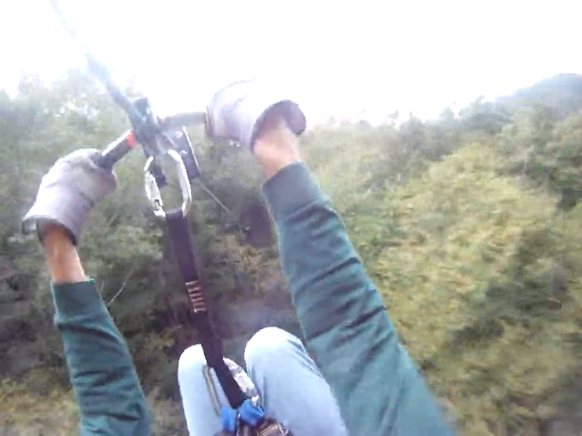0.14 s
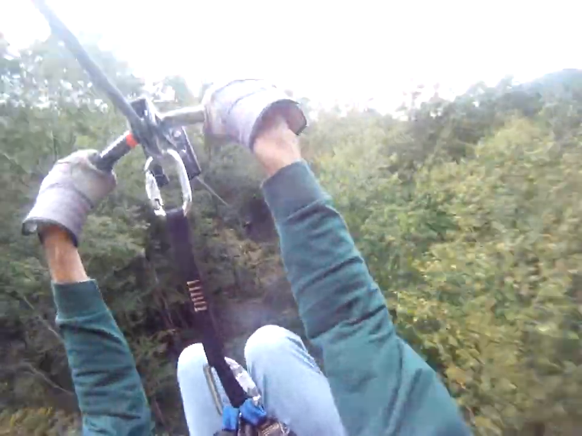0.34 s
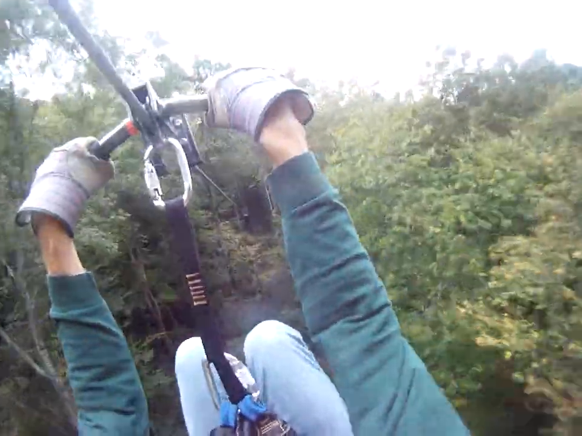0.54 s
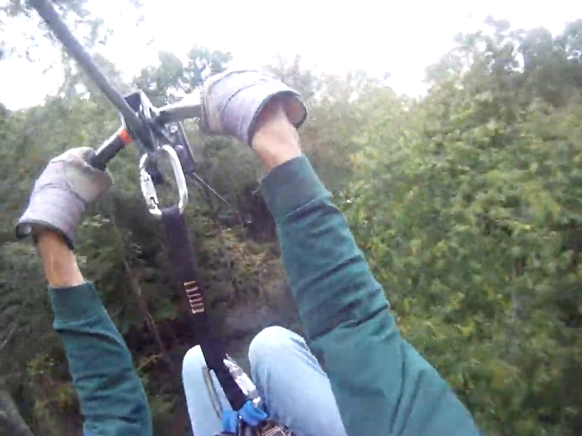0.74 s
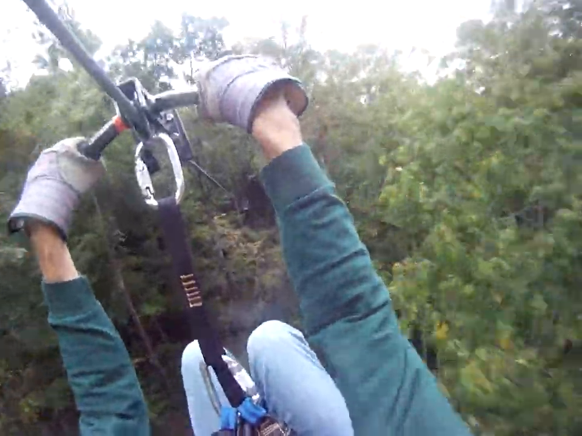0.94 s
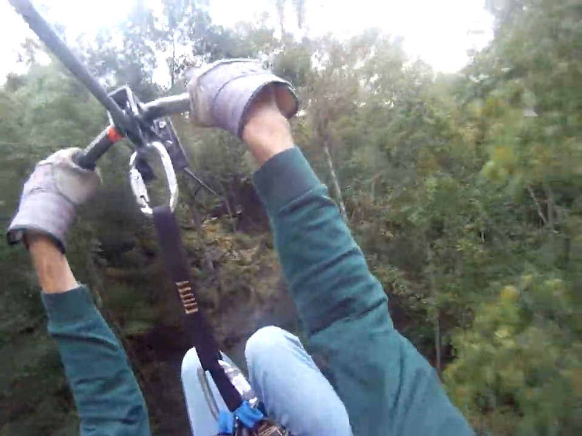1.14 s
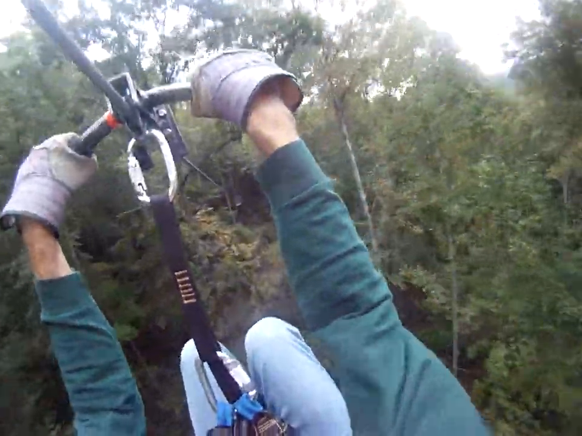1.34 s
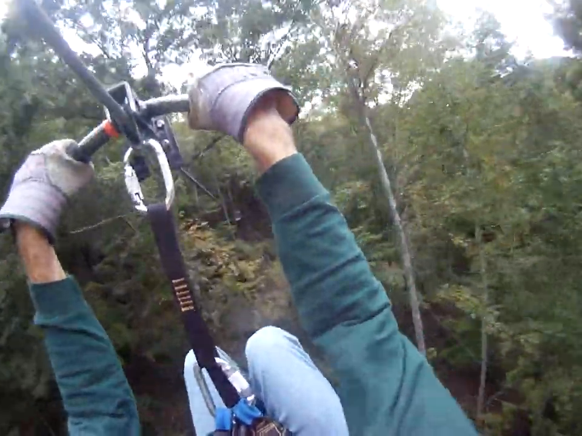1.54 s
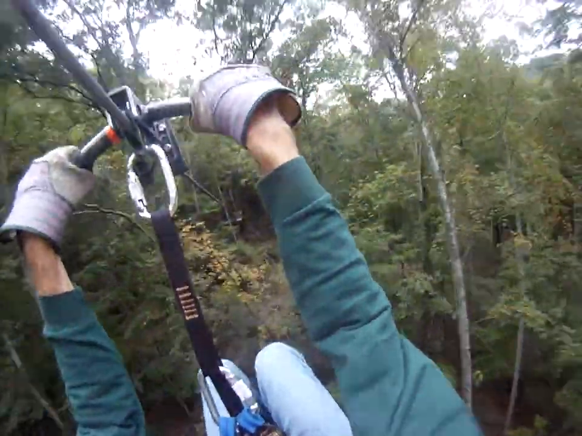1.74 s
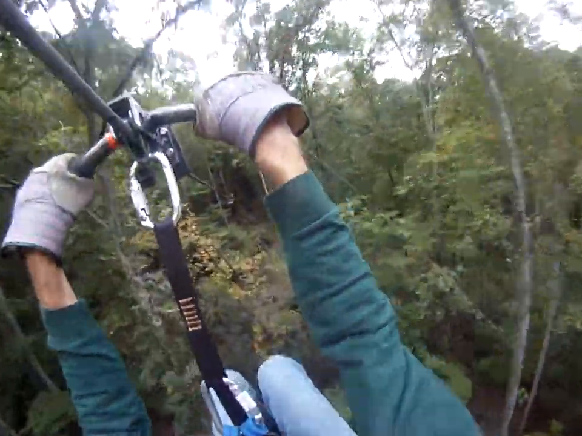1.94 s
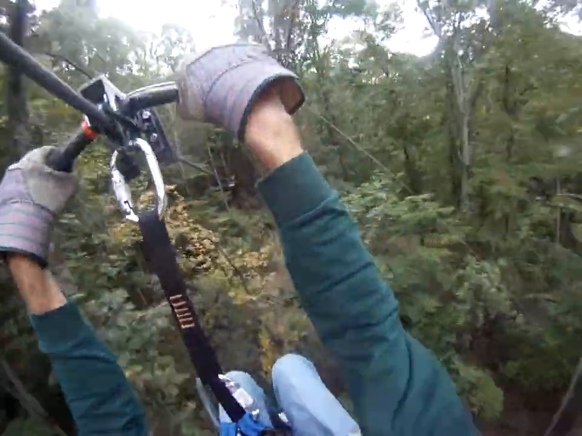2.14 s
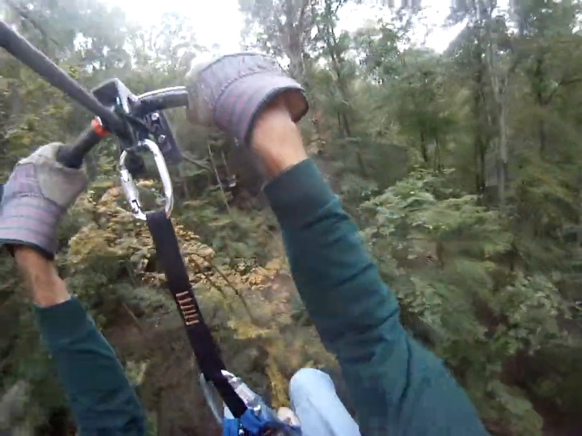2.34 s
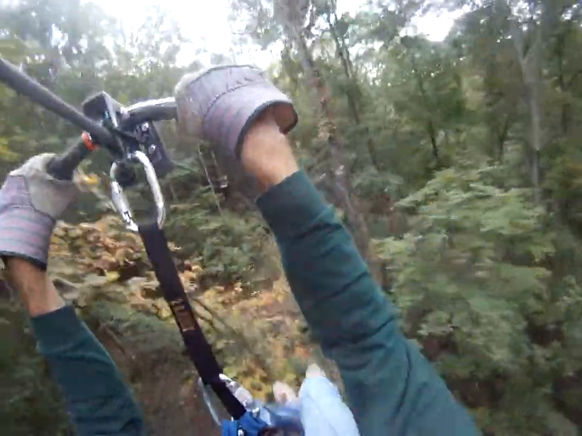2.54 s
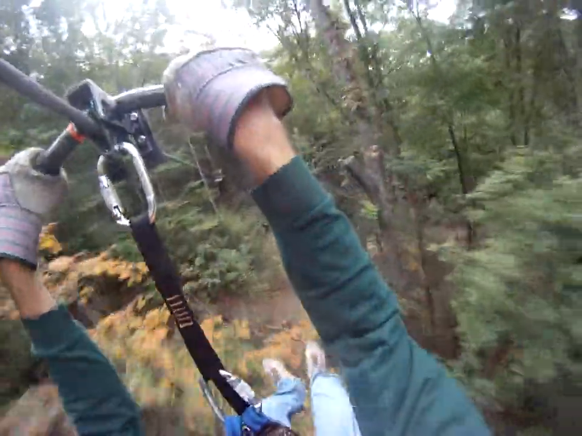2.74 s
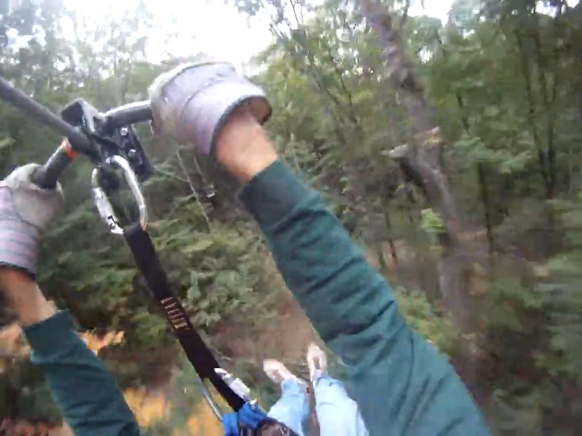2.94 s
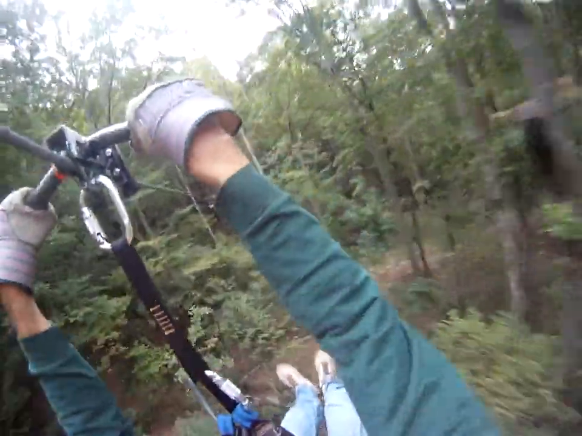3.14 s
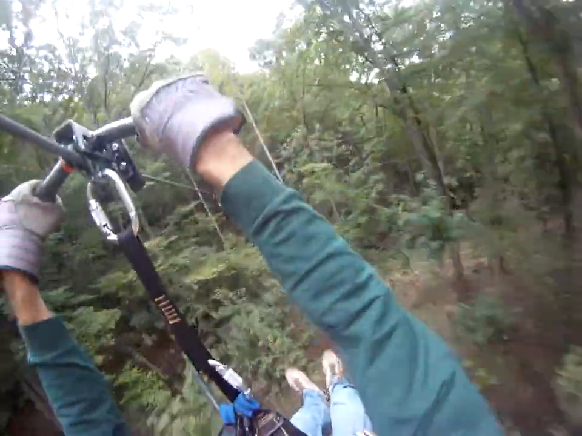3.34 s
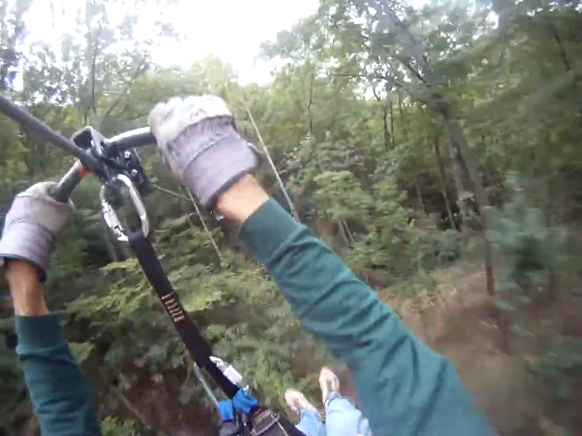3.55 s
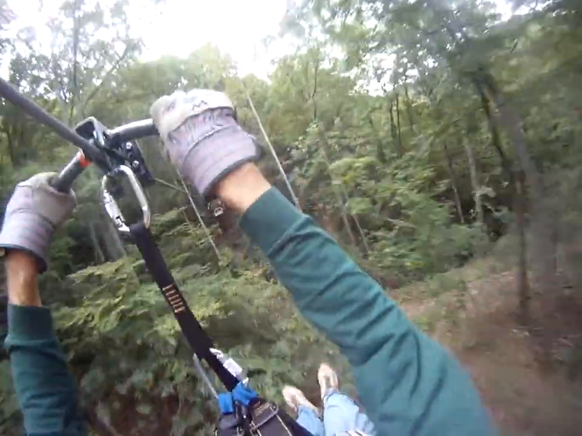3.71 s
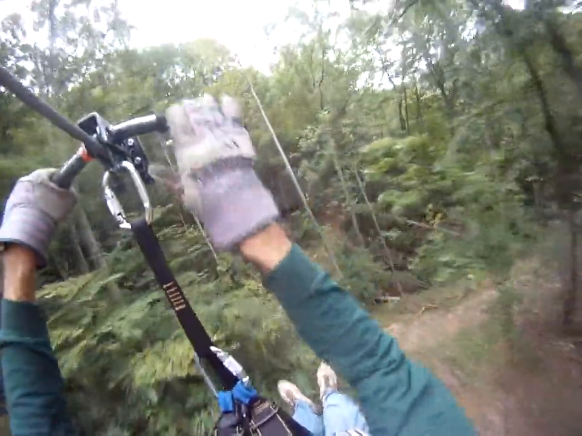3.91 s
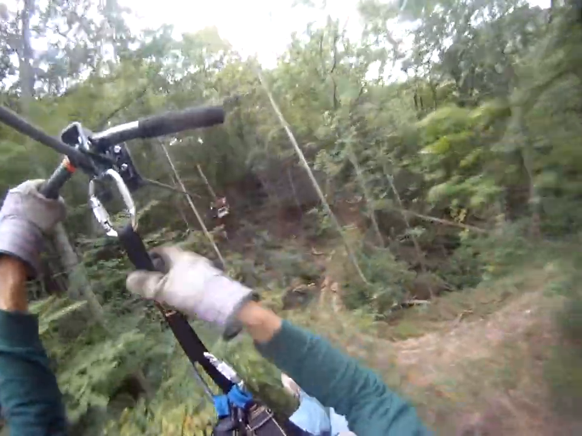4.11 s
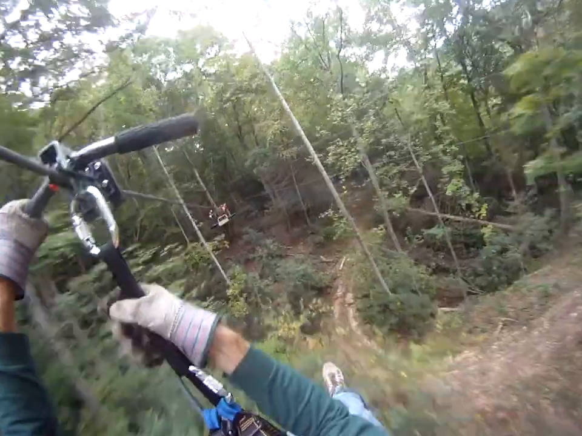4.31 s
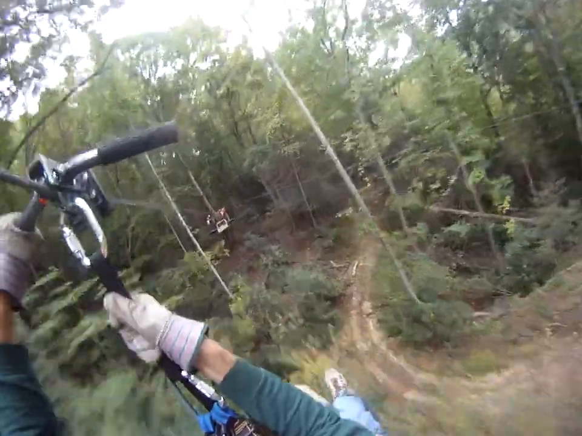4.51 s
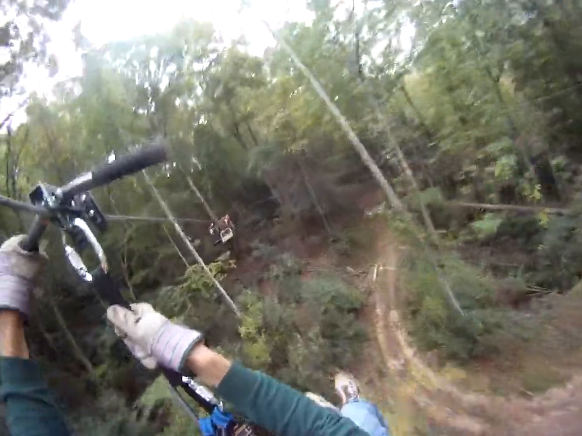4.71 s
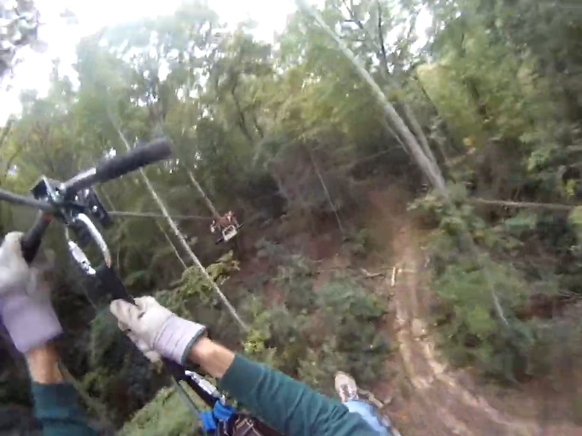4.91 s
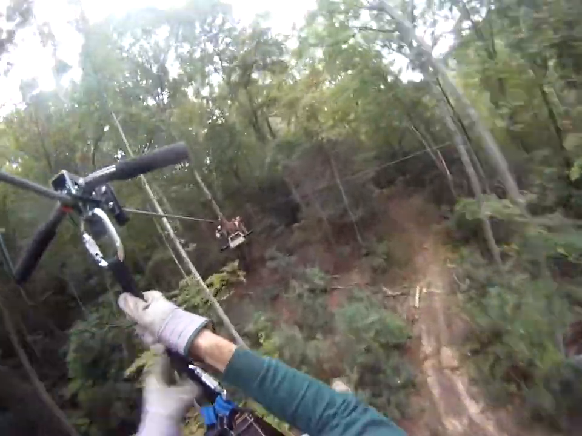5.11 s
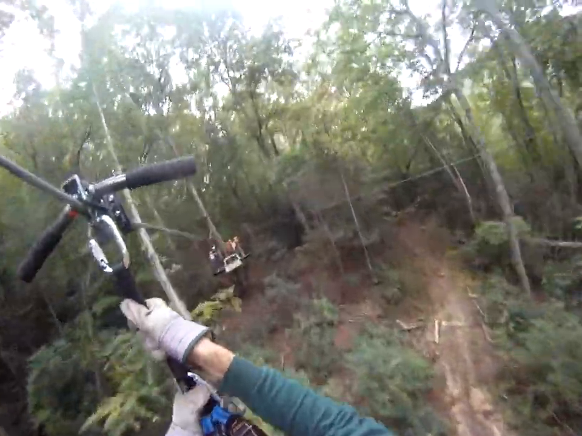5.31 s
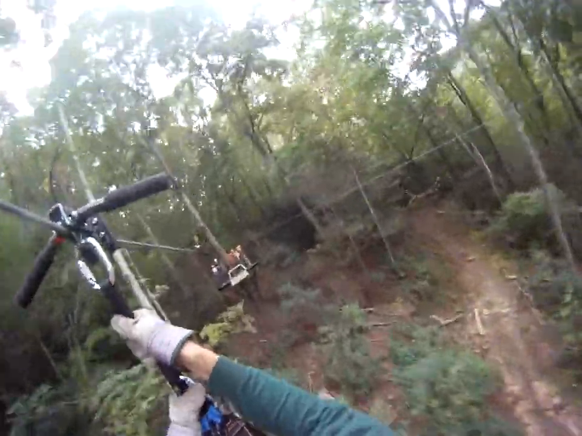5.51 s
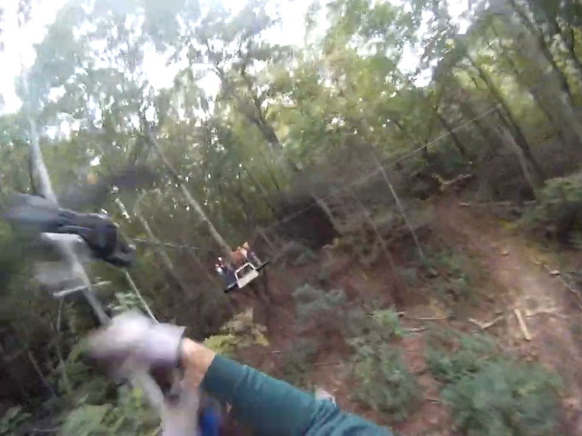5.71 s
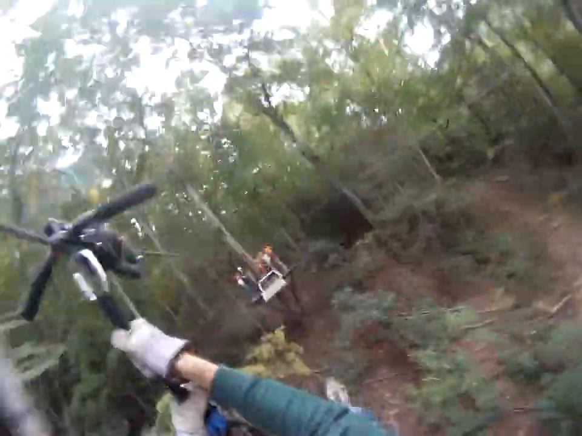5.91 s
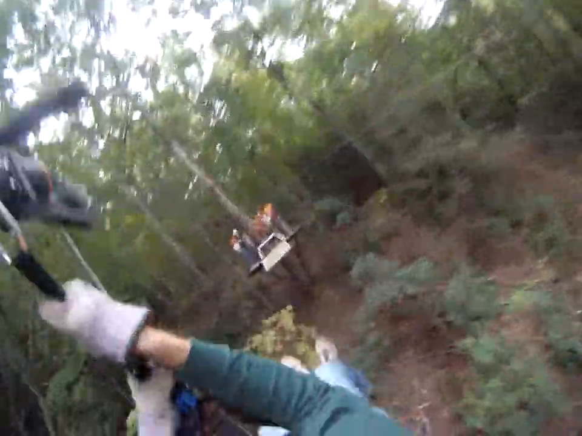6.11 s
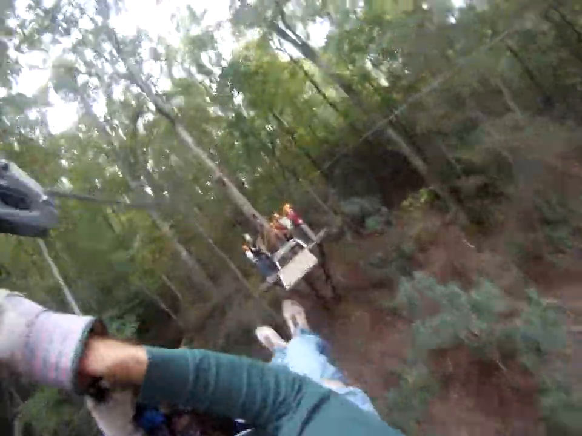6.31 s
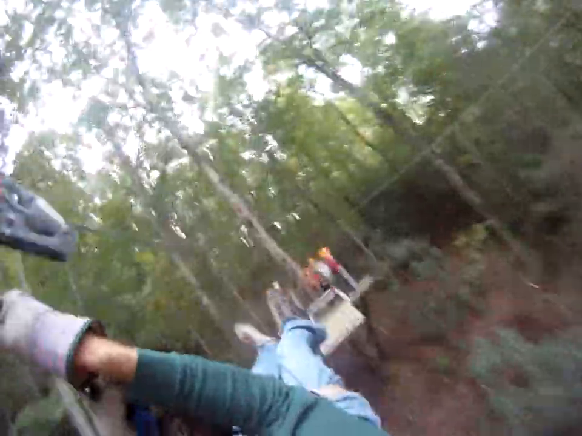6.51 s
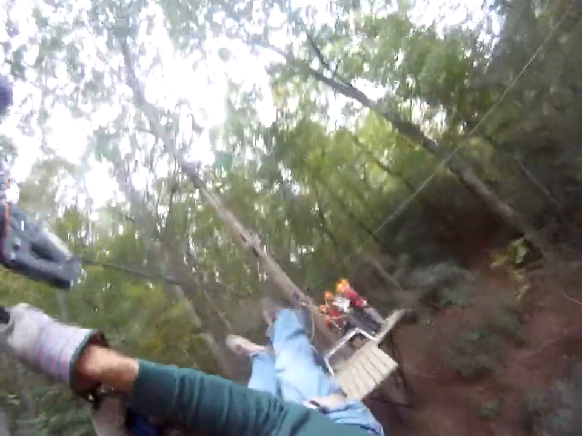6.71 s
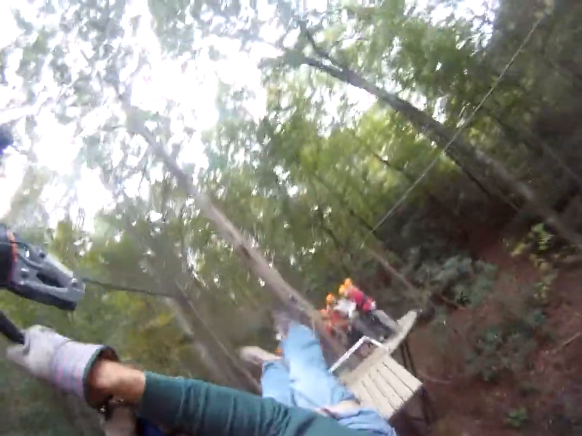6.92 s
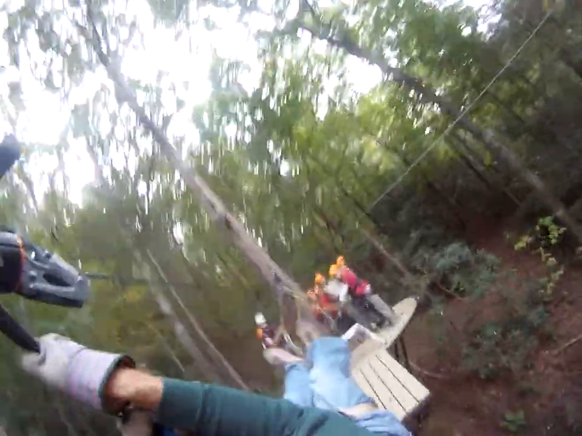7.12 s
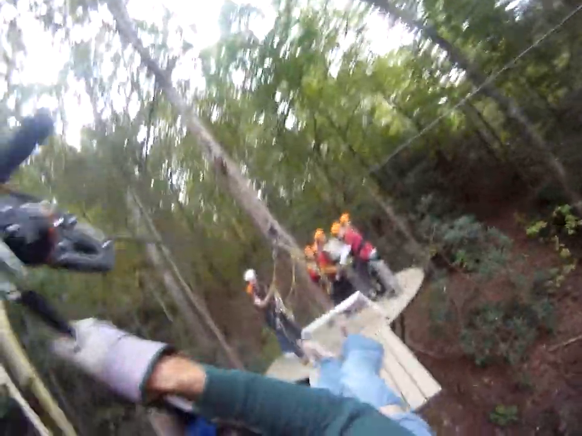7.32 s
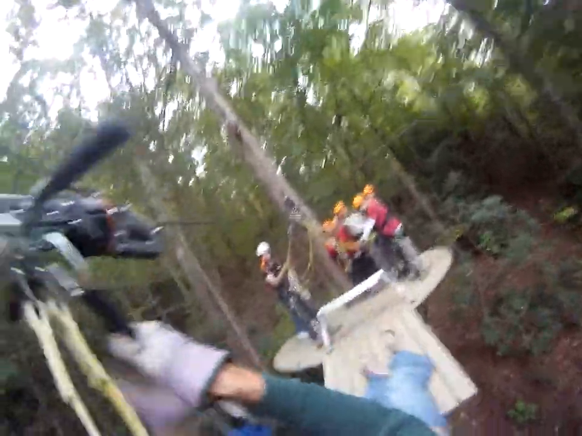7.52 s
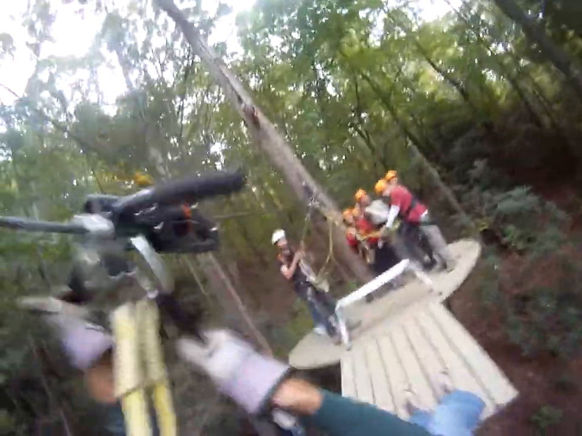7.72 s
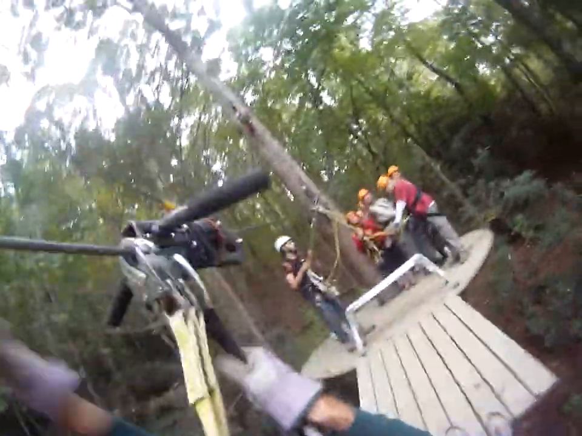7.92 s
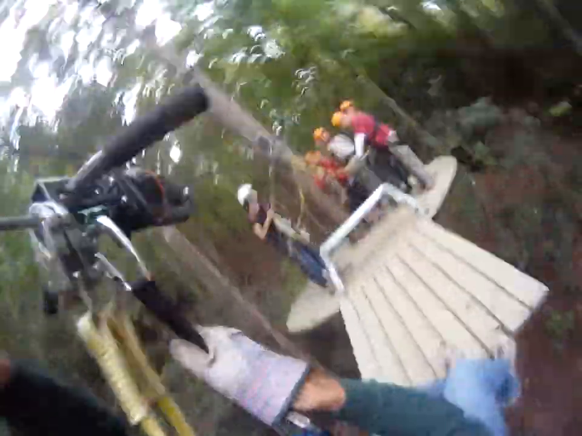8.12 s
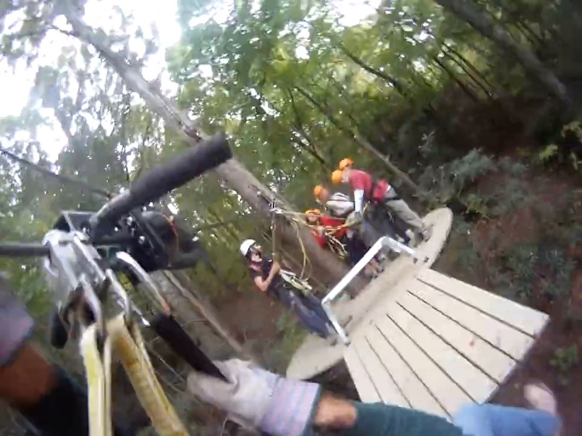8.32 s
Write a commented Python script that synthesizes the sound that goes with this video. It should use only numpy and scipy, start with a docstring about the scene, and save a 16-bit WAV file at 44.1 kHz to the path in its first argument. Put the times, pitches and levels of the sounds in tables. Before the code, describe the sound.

Metallic whirring of a zip line trolley with wind on the microphone, ending in a hard slam, knocks and a falling whine.

```python
"""A zip-line trolley runs down a stranded steel cable, an arm's length from a helmet camera, with wind on
the microphone. The strands rattle the sheaves and frame, a loose part sings in bursts and a flange squeals
now and then. Near 5.8 s the trolley slams into a brake block and rings differently with it. It then slows
to single ticks while the rider's gear knocks against the camera housing."""
import sys
import numpy as np
from scipy import signal
from scipy.fft import rfft, irfft, next_fast_len
from scipy.io import wavfile
from scipy.ndimage import uniform_filter1d

SR = 44100
rng = np.random.default_rng(int(sys.argv[2]) if len(sys.argv) > 2 else 0)


def to_wav(s):
    """Save 16-bit WAV."""
    ch = np.atleast_2d(s).T  # columns
    pcm = np.round(np.clip(ch, -1, 1) * 32767)  # PCM
    wavfile.write(sys.argv[1], SR, pcm.astype(np.int16))


N = 368235
TIME = np.arange(N) / SR
CATCH_S = 5.774  # the trolley meets the brake block
FASTEST_HZ, STRANDS_PER_TURN = 993, 10.7  # strands passing per second at top speed, and per wheel turn


def undb(db):
    """Decibels to gain."""
    return 10 ** (np.asarray(db) / 20)


def unit(x):
    """Scale to rms 1."""
    return x / np.std(x)


def drift(rate_hz):
    """Smooth random drift of spread 1."""
    hold = max(int(SR / rate_hz), 2)
    steps = np.repeat(rng.standard_normal(N // hold + 2), hold)
    return unit(uniform_filter1d(steps, hold)[rng.integers(hold):][:N])


def swell(s, length):
    """A smooth rise to 1 at time s and back, over the given length."""
    return np.cos(np.pi * np.clip((TIME - s) / length, -.5, .5))


def add(out, s, sound):
    """Mix a sound in at time s."""
    i = int(s * SR)
    out[i:i + len(sound)] += sound[:N - i]


def noise(spectrum, skirt_db=18):
    """Noise of rms 1 with a spectrum of (Hz, dB) points, falling skirt_db per octave beyond its ends."""
    size = next_fast_len(N, real=True)
    octave = np.log2(np.fft.rfftfreq(size, 1 / SR) + 1)
    hz, db = np.transpose(spectrum)
    outside = np.abs(octave - np.clip(octave, np.log2(hz[0]), np.log2(hz[-1])))
    gain = undb(np.interp(octave, np.log2(hz), db) - skirt_db * outside)
    return unit(irfft(rfft(rng.standard_normal(size)) * gain, size)[:N])


def ring(push, modes, size=8192):
    """A push rings a body with the given resonances."""
    freq = np.fft.rfftfreq(size, 1 / SR)
    power = sum(undb(db) ** 2 / (1 + (2 * (freq - hz) / width) ** 2) ** 2 for hz, width, db in modes)
    # minimum phase, so nothing rings ahead of the push
    cepstrum = irfft(np.log(power) / 2)
    cepstrum[1:size // 2] *= 2
    cepstrum[size // 2 + 1:] = 0
    response = irfft(np.exp(rfft(cepstrum)))[:size // 2]
    return signal.oaconvolve(push, response)[:len(push)]


def strike(modes, t60, scatter, size=8192):
    """One contact and the chatter that follows it, ringing the modes; peak 1."""
    push = scatter * rng.standard_normal(size) * np.exp(-np.log(1000) * TIME[:size] / max(t60, .003))
    push[0] += 1
    sound = ring(push, modes)
    return sound / np.abs(sound).max()


def waver(hz, width, steady):
    """A resonance kept ringing: a steady share of tone, the rest drifting over the given width; rms 1."""
    phase = 2 * np.pi * np.cumsum(hz + np.zeros(N)) / SR
    return unit((steady + drift(2 * width)) * np.sin(phase) + drift(2 * width) * np.cos(phase))


def speed(fastest_s=2.85, sag_hz_per_s2=9.3, brake_s=2.446, brake_shape=1.4, crawl_hz=41.16):
    """Strands passing per second: fastest at the bottom of the sag, then braked, hardest at first."""
    coasting = FASTEST_HZ - sag_hz_per_s2 * (np.minimum(TIME, CATCH_S) - fastest_s) ** 2
    braking_left = np.clip(1 - (TIME - CATCH_S) / brake_s, 0, 1)
    return crawl_hz + (coasting - crawl_hz) * braking_left ** brake_shape


# The boxy tone of the camera housing. Each row: frequency in Hz, width in Hz, level in dB.
HOUSING_MODES = [(670, 20, -7.5), (1000, 140, 0.5), (1106, 300, 1.5), (1840, 400, -8), (3470, 650, -16.5),
                 (10700, 1600, -20)]
def woods(db=-58):
    """Faint rustle of air and leaves, heard through the housing."""
    return undb(db) * unit(ring(rng.standard_normal(N), HOUSING_MODES))


# The two colours of the wind. Each row: frequency in Hz, level in dB.
RUMBLE_SPECTRUM = [(7.1, -24), (12, 0.5), (60, -12), (78, -28), (130, -120)]
BUFFET_SPECTRUM = [(34, -32), (58, 3), (124, -4.5), (173, -1), (189, -3), (232, -15.5), (269, -19),
                   (503, -27.5), (555, -30), (600, -25.5), (780, -44), (1320, -120)]
# Gusts and swings of the head. Each row: centre and length in seconds, rumble and buffet change in dB.
GUSTS = [(.27, .3, 0.5, 2.5), (1.55, 0.14, 2, 4.5), (1.75, .25, 2, 1), (3.697, 0.24, -4, 3),
         (5.89, .5, 11.5, 2), (6.782, .12, 6, -0.5), (7.73, 0.27, 9, 4.5), (8.12, 0.56, 5, 7)]
def wind(gust_db=2.4, eddy_db=1.5, breeze=0.31, turn_s=4.06, turn_length_s=1.23, shelter_db=-7):
    """Eddies at the microphone, growing as a power of airspeed: deep rumble and hollow buffeting."""
    air_db = 20 * np.log10(np.maximum(speed() / FASTEST_HZ, breeze))  # a breeze remains at a crawl
    turned = np.clip((TIME - turn_s) / turn_length_s, 0, 1)  # the rider turns, sheltering the microphone
    rumble_db = -33.8 + 0.8 * air_db
    buffet_db = -30.5 + 1.23 * air_db + shelter_db * turned
    for s, length, rumble_change, buffet_change in GUSTS:
        rumble_db += rumble_change * swell(s, length)
        buffet_db += buffet_change * swell(s, length)
    rumble = unit(noise(RUMBLE_SPECTRUM) * undb(gust_db * drift(20))) * undb(rumble_db)
    buffet = unit(noise(BUFFET_SPECTRUM) * undb(eddy_db * drift(25))) * undb(buffet_db)
    return rumble + buffet


# The low end of a knock. Each row: frequency in Hz, width in Hz, level in dB.
THUMP_MODES = [(40, 126, 1), (171, 34, -3.5), (350, 1200, -20.5)]
# Bumps on the camera. Each row: start in seconds, ring and thump peaks in dB, chatter t60 in seconds.
KNOCKS = [(4.94, -17.5, -27, 0.041), (5.826, -22, -22, 0.035), (5.84, -16, -22, 0.049),
          (5.856, -13.5, -9.5, 0.06), (5.881, -18, -40, 0.11), (5.904, -8, -6, 0.048),
          (6.054, -21.5, -33, 0.046), (6.372, -8, -18, 0.061), (6.379, -8.5, -17.5, 0.05),
          (6.391, -16, -25, .04), (6.583, -22, -31, 0.046), (6.982, -18, -31, 0.048),
          (7.412, -29, -39, 0.054), (7.836, -31.5, -47, .04), (7.902, -24, -33, 0.043),
          (7.926, -31, -44, 0.041), (8.126, -22, -35, 0.038), (8.135, -22, -36, 0.048),
          (8.167, -30, -42, 0.11)]
def knocks():
    """The rider's gear hits the housing: a dull ring over a thump."""
    out = np.zeros(N)
    for s, ring_db, thump_db, t60 in KNOCKS:
        add(out, s, undb(ring_db) * strike(HOUSING_MODES, t60, scatter=0.072))
        add(out, s, undb(thump_db) * strike(THUMP_MODES, t60, scatter=0.026))
    return out


# The loose part's voice. Each row: opening pitch and width in Hz, level in dB, share in the singing (0-1).
LOOSE_MODES = [(1884, 45, 0.5, 1), (4430, 150, -10.5, 0.1), (7570, 100, -17, 0), (10160, 110, -13, 0.07),
               (13870, 100, -15.5, 0.07)]
# Its bursts of song. Each row: start and length in seconds, pitch in Hz, level in dB.
SINGING_BURSTS = [(0, 0.74, 1880, -33.5), (0.695, 0.16, 1895, -26), (.84, .44, 1910, -28),
                  (1.241, 0.23, 1913, -25), (1.44, 0.33, 1915, -25), (1.742, .38, 1860, -34.5),
                  (3.901, .44, 1936, -31), (4.621, .26, 1870, -28.5), (4.828, 0.25, 1797, -30.5),
                  (5.04, 0.349, 1855, -26), (5.332, 0.52, 1815, -23.5)]
def loose_part(steady=1.56, surge_db=1.1, fade_s=0.06):
    """A loose metal part shaken into ringing in bursts; its lowest mode sings, the others shiver."""
    starts, lengths, pitches, _ = np.transpose(SINGING_BURSTS)
    bend_hz = np.interp(TIME, starts + lengths / 2, pitches) - pitches[0]
    bursts = sum(undb(db) * np.clip(np.minimum(TIME - s, s + length - TIME) / fade_s, 0, 1)
                 for s, length, _, db in SINGING_BURSTS)
    tones = sum(undb(db) * waver(hz + share * bend_hz, width, share * steady)
                for hz, width, db, share in LOOSE_MODES)
    return unit(tones * undb(surge_db * drift(14))) * bursts


# Brief squeals of the sheaves. Each row: centre and length in seconds, pitch in Hz, level in dB.
SQUEALS = [(1.3, 1.1, 4460, -32), (1.75, .12, 4800, -29), (2.353, 0.19, 3575, -21.5),
           (2.364, 0.32, 2510, -28.5), (2.36, 0.27, 8470, -28), (2.87, .32, 5430, -24.5),
           (2.873, .32, 6605, -29), (3.55, .2, 4790, -31), (3.84, 0.28, 3430, -20), (4.02, 0.12, 4810, -29),
           (4.48, 0.98, 1576, -34), (4.598, .4, 3850, -34), (6.081, 0.05, 2160, -12),
           (6.26, 0.067, 3555, -17), (6.461, 0.034, 3530, -17), (6.61, 0.039, 3545, -17),
           (7.16, .05, 3480, -25), (7.687, .04, 2160, -25), (7.687, .035, 9870, -37),
           (7.982, 0.032, 2156, -35)]
def squeals(width_hz=30, steady=1.24):
    """Now and then the cable rubs a flange and one resonance swells, part tone and part shiver."""
    out = np.zeros(N)
    shiver = steady + drift(2 * width_hz) + 1j * drift(2 * width_hz)
    for s, length, hz, db in SQUEALS:
        near = np.abs(TIME - s) < length / 2
        tone = unit(np.real(shiver[near] * np.exp(2j * np.pi * hz * TIME[near])))
        out[near] += undb(db) * swell(s, length)[near] * tone
    return out


# The pitched zip of the cable. Each row: multiple of the strand rate, relative level in dB.
WHINE_PARTIALS = [(1, -24.5), (1.5, -42), (1.65, -32), (2, -24), (2.5, -29.5), (3, -29.5), (4, -30.5),
                  (5, -36)]
def whine(strand_hz, jitter=0.00296, waver_db=2, top_db=2, fall_db_per_hz=0.1, braked_db=2.8, fade_hz=385):
    """The strands' regular ripple: clear at top speed, growing again under braking, gone at a crawl."""
    slowing = strand_hz.max() / np.maximum(strand_hz, fade_hz)
    phase = 2 * np.pi * np.cumsum(strand_hz * (1 + jitter * slowing * drift(40))) / SR
    coasting_db = fall_db_per_hz * (strand_hz - FASTEST_HZ)
    load_db = top_db + np.where(TIME < CATCH_S, coasting_db, braked_db * (slowing - 1))
    load = undb(load_db) / (1 + (fade_hz / strand_hz) ** 8)
    return load * sum(undb(db + waver_db * drift(7)) * np.sqrt(2) * np.sin(multiple * phase)
                      for multiple, db in WHINE_PARTIALS)


def rattle(strand_hz, hits_per_strand=30, grain_db=1.0, bunching=0.43, wear=0.59, mark_count=512):
    """Dense tiny impacts, bunched as each strand passes, and wheel marks that return on every turn."""
    strands = np.cumsum(strand_hz) / SR
    struck = rng.random(N) < hits_per_strand * strand_hz / SR
    impacts = unit(struck * rng.standard_normal(N) / np.sqrt(strand_hz) * undb(grain_db * drift(900)))
    turns = strands / STRANDS_PER_TURN * rng.uniform(.9, 1.1)  # no two parts turn at quite the same rate
    marks = np.floor(turns * mark_count).astype(int)
    depth = rng.standard_normal(mark_count)[marks % mark_count]
    tread = unit(depth * np.diff(marks, prepend=0) / np.sqrt(strand_hz))
    return unit((impacts + wear * tread) * (1 + bunching * np.cos(2 * np.pi * strands)))


def body(modes, ripple, rattles, sheave_db, frame_db, split_hz=3045):
    """The ripple rings every mode, each rattle its own group: frame below the split, sheaves above."""
    sound = ring(ripple, modes)
    sound += sum(ring(push, modes[i::len(rattles)]) for i, push in enumerate(rattles))
    frame = signal.sosfiltfilt(signal.butter(6, split_hz, "low", fs=SR, output="sos"), sound)
    sheaves = signal.sosfiltfilt(signal.butter(6, split_hz, "high", fs=SR, output="sos"), sound)
    return unit(sheaves) * undb(sheave_db) + unit(frame) * undb(frame_db)


# The ring of the trolley alone. Each row: frequency in Hz, width in Hz, level in dB.
TROLLEY_MODES = [(637, 48, -22.5), (772, 88, -23), (1013, 195, -18), (1192, 145, -18), (1646, 550, -15),
                 (1814, 370, -16), (2149, 150, -13.5), (2400, 274, -10.5), (2668, 250, -13.5),
                 (2926, 104, -13.5), (3457, 130, -1.5), (3597, 124, 1.5), (3767, 300, -6),
                 (4380, 345, -12.5), (4810, 150, -10.5), (5120, 750, -16), (5393, 170, -8.5),
                 (6616, 276, -10.5), (7080, 310, -15), (7600, 410, -16), (8280, 220, -9), (8475, 173, -7),
                 (9100, 50, -18.5), (9580, 640, -23.5), (10100, 1670, -32), (13700, 1000, -33),
                 (14400, 800, -27), (14942, 80, -22)]
# The fader ride on the sheaves. Each row: time in seconds, level in dB.
SHEAVE_LEVELS = [(0, -19.5), (1.0, -18.6), (1.7, -17.3), (1.95, -17.5), (2.8, -16), (3.85, -16),
                 (4.0, -17.5), (4.5, -18.5), (4.95, -21), (5.78, -22)]
def rolling(ripple, rattles, loudest_frame_db=-25, frame_follows=0.55):
    """The trolley runs free; the frame's level follows the sheaves in part."""
    sheave_db = np.interp(TIME, *np.transpose(SHEAVE_LEVELS))
    frame_db = loudest_frame_db + frame_follows * (sheave_db - sheave_db.max())
    return body(TROLLEY_MODES, ripple, rattles, sheave_db, frame_db)


# The ring of trolley and brake block together. Each row: frequency in Hz, width in Hz, level in dB.
BRAKED_MODES = [(937, 180, -24.5), (1190, 130, -23.5), (1632, 277, -12), (1797, 220, -13), (2152, 126, 0.5),
                (2493, 270, -3.5), (2756, 670, -20.5), (2980, 310, -22.5), (3531, 190, -1),
                (3795, 170, -11), (4360, 410, -17.5), (4800, 290, -16.5), (5090, 82, -13),
                (5340, 420, -19.5), (6750, 730, -22.5), (6780, 76, -18), (7190, 330, -19),
                (7830, 400, -22.5), (8470, 182, -7), (9116, 40, -36), (9519, 640, -20), (9770, 83, -10),
                (10319, 190, -26), (14000, 160, -29), (14300, 910, -21.5), (14400, 150, -20),
                (15900, 1100, -29)]
def braking(strand_hz, ripple, rattles, duck_s=5.915, recover_s=0.12, judder_db=1.1, stall_hz=110):
    """The trolley pushes the juddering block, and its ring fades as a power of the falling speed."""
    speed_db = 20 * np.log10(strand_hz / 650)
    metal = body(BRAKED_MODES, ripple, rattles,
                 sheave_db=-16.5 + 1.29 * speed_db, frame_db=-18 + 1.05 * speed_db)
    hum = undb(-40) * ripple  # the strands, straight through the harness
    # the rattle starts subdued, ducks sharply after the last slam and swells back
    duck_db = np.where(TIME < duck_s, -8, -17.5 * np.exp(-np.abs(TIME - duck_s) / recover_s))
    moving = 1 / (1 + (stall_hz / strand_hz) ** 2)  # the rattle dies at a crawl
    return (metal + hum) * undb(duck_db + judder_db * drift(55)) * moving


# The stiff casing's bright edge. Each row: frequency in Hz, width in Hz, level in dB.
CASING_MODES = [(6040, 7300, -20.5)]
# Slams, then ticks. Each row: start in seconds, peak in dB, chatter t60 in seconds.
CLANKS = [(5.797, -3, 0.058), (5.852, -4, 0.031), (5.865, -3.5, 0.04), (5.905, -7, 0.028),
          (7.797, -29, .02), (7.9, -31, .03), (7.924, -30, 0.035), (7.974, -30.5, 0.04), (8.019, -28, .025),
          (8.071, -37, 0.018), (8.103, -36, 0.011), (8.125, -31, .02), (8.153, -30, .03), (8.172, -30, .03),
          (8.187, -28.5, 0.051), (8.212, -35, 0.14), (8.265, -35.5, 0.1), (8.295, -36, 0.033),
          (8.31, -34, 0.13)]
def clanks():
    """Metal contacts ring trolley, block and casing: hard at the catch, single ticks at a crawl."""
    out = np.zeros(N)
    for s, db, t60 in CLANKS:
        add(out, s, undb(db) * strike(BRAKED_MODES + CASING_MODES, t60, scatter=0.58))
    return out


def trolley(restless_db=1.18, flutter_db=0.65, chatter_db=0.29, wobble=0.035):
    """The trolley rolls free, then rings with the block; it flutters and pulses once a wheel turn."""
    strand_hz = speed()
    ripple = whine(strand_hz)
    rattles = [rattle(strand_hz) * undb(restless_db * drift(14)) for _ in range(3)]
    wheel_angle = 2 * np.pi * np.cumsum(strand_hz / STRANDS_PER_TURN) / SR
    pressure = (1 + wobble * np.sin(wheel_angle)) * undb(flutter_db * drift(45) + chatter_db * drift(130))
    free = rolling(ripple, rattles)
    braked = braking(strand_hz, ripple, rattles)
    return np.where(TIME < CATCH_S, free, braked) * pressure


def scene():
    """Everything at the one microphone."""
    return (trolley() + loose_part() + squeals() + clanks() + knocks() + wind() + woods())[None]


def record(dry, notch_hz=(11000, 13000), top_hz=15400):
    """A band near 12 kHz is filtered out; the sound clips at full scale and its top is cut."""
    notch = signal.butter(3, notch_hz, "bandstop", fs=SR, output="sos")
    lowpass = signal.ellip(10, .2, 80, top_hz, fs=SR, output="sos")
    clipped = np.clip(signal.sosfilt(notch, dry), -1, 1)
    return signal.sosfilt(lowpass, clipped)


dry = scene()
out = record(dry)
to_wav(out)
```